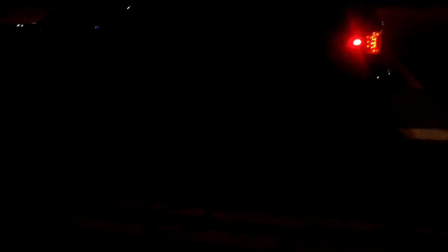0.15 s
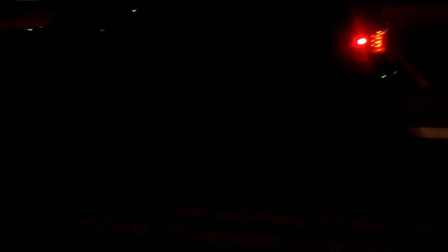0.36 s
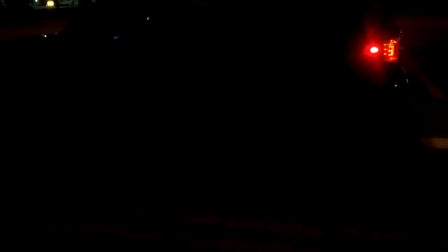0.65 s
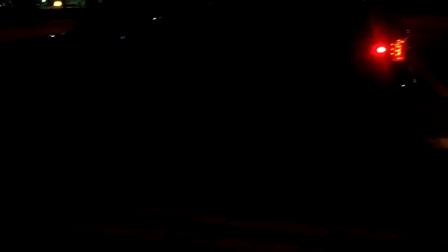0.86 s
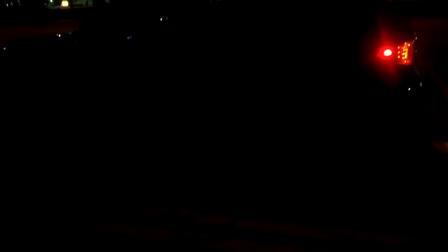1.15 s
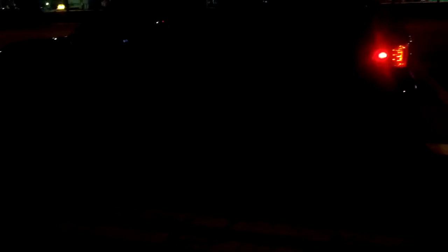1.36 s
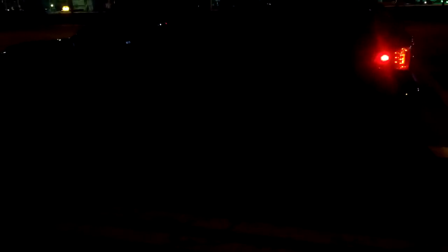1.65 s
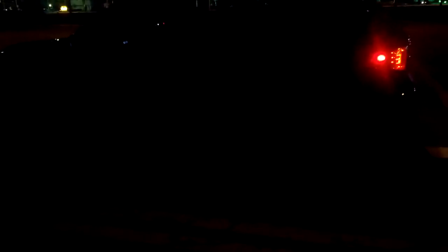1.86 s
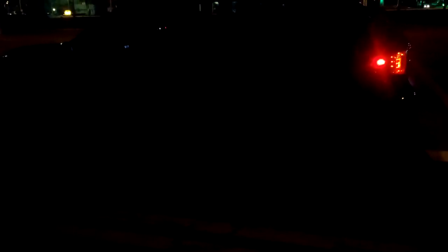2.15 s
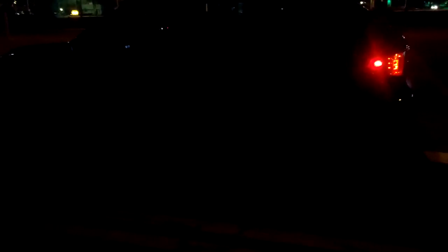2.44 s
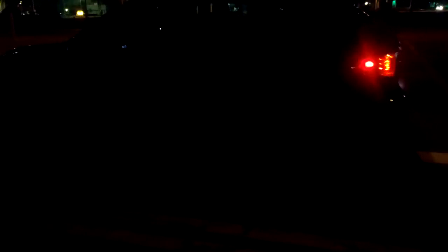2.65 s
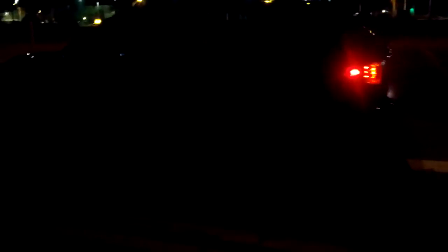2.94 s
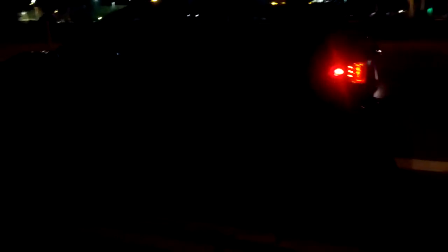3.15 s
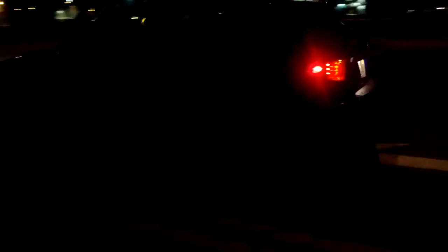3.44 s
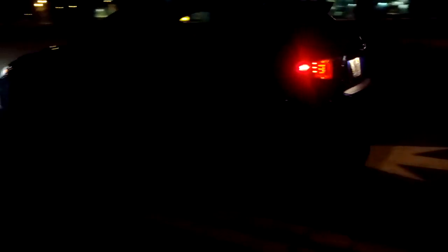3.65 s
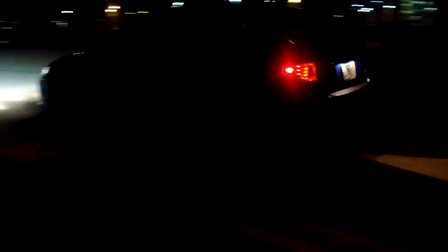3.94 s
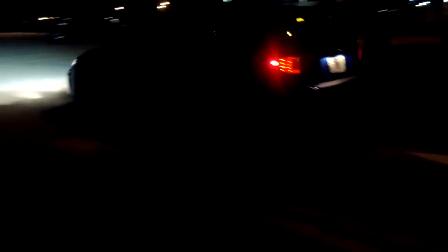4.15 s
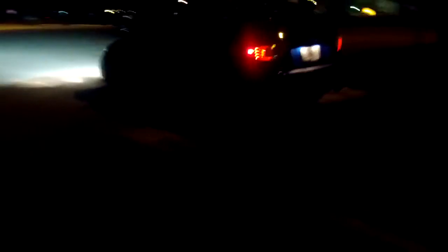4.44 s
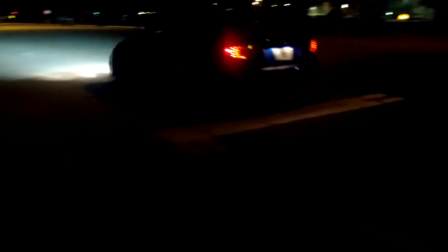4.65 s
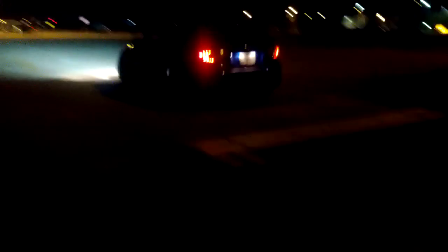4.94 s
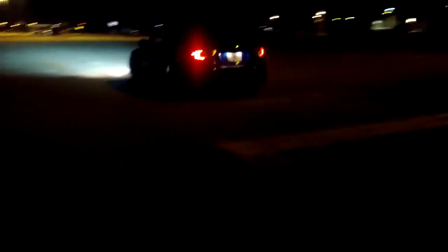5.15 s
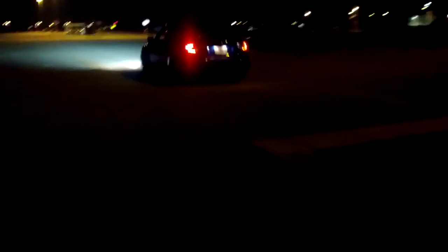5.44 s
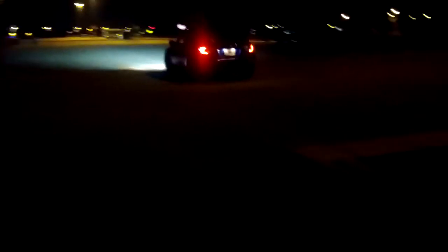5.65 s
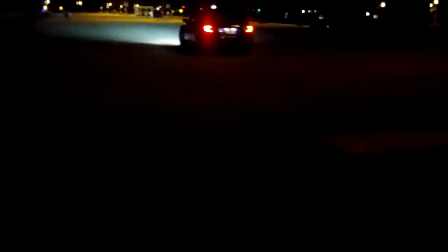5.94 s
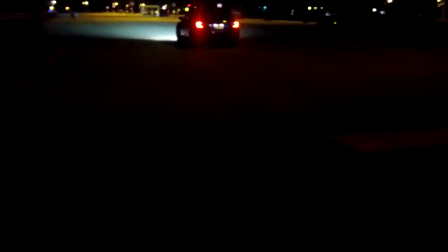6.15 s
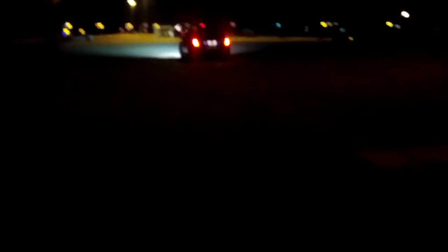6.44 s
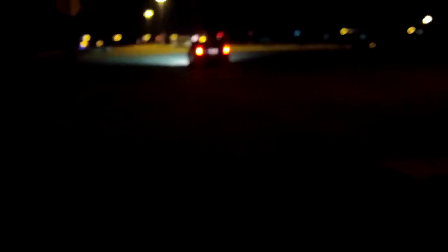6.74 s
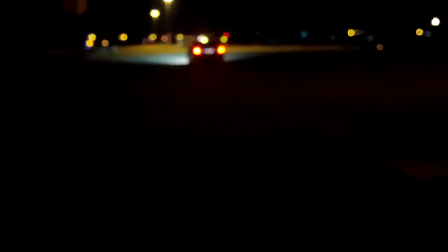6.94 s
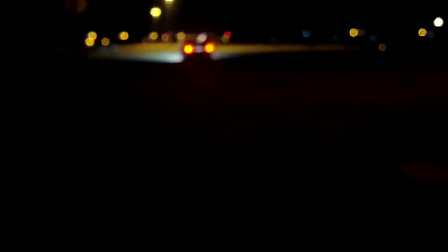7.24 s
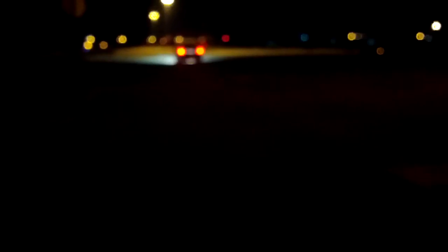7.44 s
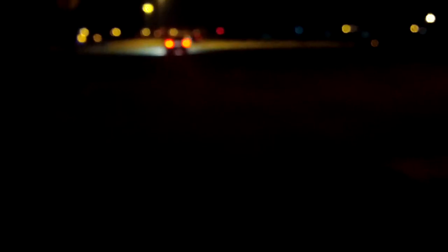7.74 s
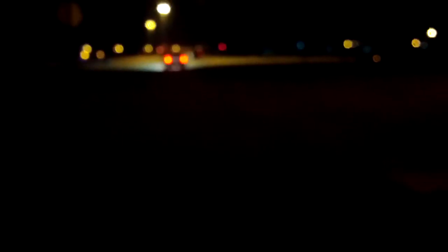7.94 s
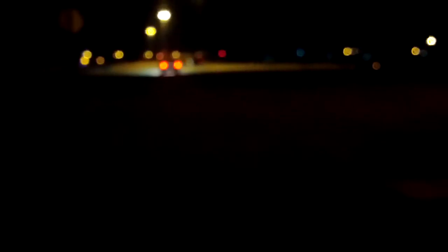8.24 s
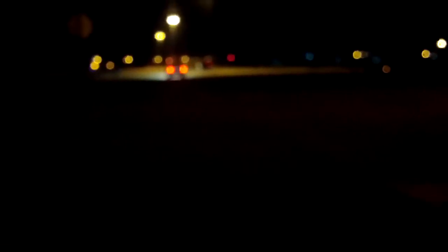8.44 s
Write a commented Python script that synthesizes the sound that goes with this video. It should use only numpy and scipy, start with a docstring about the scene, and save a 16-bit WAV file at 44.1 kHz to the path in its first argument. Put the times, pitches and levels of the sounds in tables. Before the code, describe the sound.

A car with an open exhaust idles close by with a deep, uneven throb, then revs twice. It pulls away at low revs, puttering and slapping, and accelerates in one long climb that turns into a tearing rasp. The driver lifts off and the engine drones more quietly as it recedes down the street. Tyre roar and low town rumble lie underneath, and the loudest pulses slightly overload the microphone.

```python
"""A throbbing, unmuffled car idles close by, revs twice, tears away down a street and coasts off.
Its four cylinders fire in pairs, bank against bank, and ring the open pipe: that is the throb.
Under load the pulses slap out of the pipe; at high revs they steepen into a tearing rasp.
A breathy drone, hiss, a fan and a buzzing heat shield sit around it, over tyres and town rumble.
The loudest pulses overload the microphone."""
import sys
import numpy as np
from scipy import signal
from scipy.fft import rfft, irfft, next_fast_len
from scipy.io import wavfile
from scipy.ndimage import uniform_filter1d, map_coordinates

SR = 44100
rng = np.random.default_rng(int(sys.argv[2]) if len(sys.argv) > 2 else 0)


def bounce(signal):
    """Save signal as a 16-bit WAV file at the path given by the first command-line argument."""
    frames = np.transpose(np.atleast_2d(signal))
    limited = np.clip(frames, -1, 1)
    pcm = np.round(limited * 32767).astype(np.int16)
    wavfile.write(sys.argv[1], SR, pcm)


N = 378378
TIME = np.arange(N) / SR

# each cylinder in firing order; the sign is its bank (push [relative])
CYLINDERS = [0.78, 0.76, -0.84, -1.06]
# level ride of the exhaust note (time [s], relative level [dB])
EXHAUST_RIDE = [(0.76, -18), (1.39, -18), (1.85, -8.5), (2.82, -11), (3.28, -6.5), (4.36, -10),
                (5.06, -6.5), (5.37, -11), (5.84, -9.5), (7.12, -12.5), (7.36, -26), (7.91, -21.5),
                (8.12, -25), (8.34, -21), (8.56, -28.5)]


def amp(db):
    """Decibels to amplitude."""
    return 10 ** (np.asarray(db) / 20)


def unit(x):
    """Scales x to rms 1."""
    return x / np.sqrt(np.mean(x ** 2) + 1e-20)


def curve(points, t=TIME):
    """Joins (time, value) points with straight lines."""
    return np.interp(t, *np.transpose(points))


def ramp(start_s, length_s):
    """Rises from 0 to 1."""
    return np.clip((TIME - start_s) / length_s, 0, 1)


def db_at(points, hz):
    """Reads a spectrum along a log frequency axis."""
    f, db = np.transpose(points)
    return np.interp(np.log(hz + 1), np.log(f + 1), db)


def colour(x, eq):
    """Shapes x with an EQ curve, at rms 1."""
    size = next_fast_len(len(x) + 4096)
    gain = amp(db_at(eq, np.fft.rfftfreq(size, 1 / SR)))
    return unit(irfft(rfft(x, size) * gain, size)[:len(x)])


def resonator(eq, size=4096):
    """Frequency grid and complex log gain of a passive resonator with this spectrum."""
    hz = np.arange(size // 2 + 1) * 2
    log_gain = np.log(amp(db_at(eq, hz)))
    mirrored = np.r_[log_gain, log_gain[-2:0:-1]]
    return hz, signal.hilbert(mirrored).conj()[:len(hz)]


def wander(t, rate):
    """Smooth random drift of spread about 1, with rate changes per unit of t."""
    return map_coordinates(rng.standard_normal(4096), [t * rate], order=3, mode="wrap")


def firing_hz(flywheel_s=.121):
    """Firings per second; the flywheel rounds off every change."""
    # engine speed (time [s], firing rate [Hz])
    engine_speed = [(0.7, 50.9), (1.508, 52.82), (2.145, 75.84), (2.477, 71.64), (2.944, 54.33),
                    (3.464, 71.58), (3.935, 55.65), (4.277, 47.4), (4.353, 54.18), (4.882, 72.29),
                    (5.509, 100.61), (5.984, 124.72), (6.783, 174.93), (7.146, 193.62), (7.356, 186.14),
                    (7.571, 188.37), (7.726, 177.13), (8.356, 138.98), (8.58, 131.81)]
    return uniform_filter1d(curve(engine_speed), int(flywheel_s * SR), mode="nearest")


def revs(idle_hz=51):
    """Engine speed in octaves above idle."""
    return np.log2(firing_hz() / idle_hz)


def load(clutch_s=3.01, lift_off_s=7.19):
    """How hard the engine pulls, 0-1: the clutch bites, later the driver lifts off."""
    return ramp(clutch_s, .31) - ramp(lift_off_s, .13)


def idling(octaves=.19):
    """1 while the engine ticks over, 0 once it is revved or pulls."""
    return (1 - load()) * np.exp(-(revs() / octaves) ** 2)


def tearing(centre_hz=163.5, octaves=.53):
    """How far the pulses steepen into shocks, 0-1: only under load, around one firing rate."""
    return load() * np.exp(-(np.log2(firing_hz() / centre_hz) / octaves) ** 2)


def overrunning(start_s=7.3, stop_s=7.78):
    """The short spell after lift-off in which the pipe drones, 0-1."""
    return ramp(start_s, .17) - ramp(stop_s, .047)


def distance_db(roll_s=3.716, near_m=2.79, accel_m_per_s2=1.61):
    """Level lost by spreading as the car rolls away, gaining speed evenly."""
    travelled_m = .5 * accel_m_per_s2 * np.maximum(TIME - roll_s, 0) ** 2
    return -20 * np.log10(np.hypot(near_m, travelled_m) / near_m)


def firing_gate(cycles, lead, decay, weak_bank, floor=1.0):
    """Jumps at each firing and dies away; weak_bank scales one bank. Lead and decay are in firings."""
    firings = cycles * len(CYLINDERS) + lead
    strength = np.where(firings % len(CYLINDERS) < 2, 1, weak_bank)
    return unit(floor + strength * np.exp(-(firings % 1) / decay))


def crack(firings):
    """Force of each firing: lumpy while the engine lugs at low revs, more even when it spins."""
    # the pulses of one cycle, counted from the hardest (force [relative])
    forces = [1.9, 1.1, .3, .25]
    # the cylinder that hits hardest (from time [s], place in firing order [index])
    hardest = [(0, 1), (2.95, 0), (3.3, 1), (3.6, 0), (3.85, 2), (4.42, 3), (5.05, 1)]
    from_s, places = np.transpose(hardest)
    leader = places[np.searchsorted(from_s, TIME, side="right") - 1]
    place = (np.floor(firings) - leader).astype(int) % len(forces)
    lumpiness = np.interp(TIME, [2.9, 3.2, 5, 6.2], [.3, 1, 1, .4])
    return 1 + lumpiness * (np.take(forces, place) - 1)


def street(waver_db=-1.4):
    """The bed: tyre roar and low town rumble."""
    # roar and rumble (frequency [Hz], gain [dB])
    eq = [(20, 1), (60, 6.5), (200, 15.5), (450, -2), (700, -5), (950, 2.5), (1200, 3), (1550, -7.5),
          (2500, -18.5), (4000, -26.5), (8000, -30.5), (15000, -43)]
    # swell of the bed (time [s], level [dB])
    swell = [(.7, -74.5), (4, -45.5), (6, -19.5), (7.4, -29.5), (8, -29.5), (8.58, -32)]
    return amp(curve(swell) + waver_db * wander(TIME, 12)) * colour(rng.standard_normal(N), eq)


def street_echo(x, level_db=-19, t60_s=5.2):
    """The buildings along the street hold a long, faint tail."""
    t = TIME[:2 * SR]
    tail = rng.standard_normal(len(t)) * amp(-60 * t / t60_s)
    return amp(level_db) * signal.fftconvolve(x, tail / np.linalg.norm(tail))[:N]


def ticks(decay_s=.003, gain_db=-8):
    """Short dry ticks of noise."""
    # tick cues (time [s], relative level [dB])
    cues = [(4.7344, -23), (4.9843, -17.5), (8.4622, -31)]
    envelope = sum(amp(db + gain_db) * (TIME >= s) * np.exp(-abs(TIME - s) / decay_s) for s, db in cues)
    return envelope * rng.standard_normal(N)


def thump(at_s=4.985, width_s=.028, level_db=-19):
    """One dull, low thud while the car accelerates."""
    # low boom (frequency [Hz], gain [dB])
    eq = [(15, -13), (35, -2), (90, -3), (200, -13), (600, -45), (3000, -80)]
    return amp(level_db) * np.exp(-((TIME - at_s) / width_s) ** 2) * colour(rng.standard_normal(N), eq)


def squeal(pitch_hz=4170, waver_hz=18):
    """A thin, faint squeal as the car starts to roll."""
    # it swells just before it stops (time [s], close-up level [dB])
    swell = [(2.9, -68), (3.1, -51), (3.66, -60), (3.81, -43), (3.97, -75)]
    phase = 2 * np.pi * np.cumsum(pitch_hz + waver_hz * wander(TIME, 150)) / SR
    return amp(curve(swell) + distance_db()) * np.sin(phase)


def cooling_fan():
    """Two thin, wavering fan tones at idle, fading out during the revving."""
    # fan tones (frequency [Hz], relative level [dB])
    tones = [(473.7, -44), (554.5, -46.5)]
    whine = sum(amp(db) * np.sin(2 * np.pi * hz * TIME + 1.7 * wander(TIME, 9.9)) for hz, db in tones)
    return np.interp(TIME, [1.6, 3.2], [.6, 0]) * np.sqrt(2) * whine


def hiss(cycles, idle_db=-43.5, per_octave_db=6, load_db=1.5):
    """A fine, lightly pulsing hiss from engine bay and pipe, heard while the car is close."""
    # airy top end (frequency [Hz], gain [dB])
    eq = [(2000, -15), (4000, -2), (6500, -15), (8000, -5.5), (10000, 2), (11500, 0.5), (13000, -3),
          (15700, -8.5)]
    gate = firing_gate(cycles, lead=.55, decay=.22, weak_bank=.38, floor=.9)
    level = amp(idle_db + per_octave_db * revs() + load_db * load() + distance_db())
    return level * (1 - ramp(4.84, 1.1)) * colour(gate * rng.standard_normal(N), eq)


def heat_shield(cycles, level_db=-49, lug_octaves=.56):
    """A loose heat shield buzzes while the engine lugs under load at low revs."""
    # ring of the shield (frequency [Hz], gain [dB])
    eq = [(1900, -35), (2450, -3), (2720, 0), (3000, -16), (3350, -30), (3700, -9), (4100, -22),
          (5500, -36)]
    gate = firing_gate(cycles, lead=0, decay=.56, weak_bank=.8)
    lugging = load() * np.exp(-(revs() / lug_octaves) ** 2)
    return amp(level_db) * lugging * colour(gate * rng.standard_normal(N), eq)


def close_drone(cycles, idle_db=-42, per_octave_db=13):
    """A pulsing, breathy drone near 420 and 660 Hz, heard while the car is close."""
    # tone of the drone (frequency [Hz], gain [dB])
    eq = [(220, -26), (340, 7.5), (420, 13), (490, -5), (660, 2), (900, -10), (1600, -23), (2100, -17),
          (2550, -10.5), (3100, -15.5), (3700, -10.5), (5000, -29)]
    gate = firing_gate(cycles, lead=.075, decay=.2, weak_bank=.7)
    level = amp(idle_db + per_octave_db * revs()) * (1 - ramp(2.5, 1.5))
    return level * colour(gate * rng.standard_normal(N), eq)


def overrun(cycles, level_db=-29):
    """Just after lift-off the pipe drones briefly, at one wave per turn of the crankshaft."""
    return amp(level_db) * overrunning() * np.sin(2 * np.pi * 2 * cycles)


def gas_db(idle_db=-45, per_octave_db=6, load_db=12.5, tear_db=17):
    """Base level of the gas leaving the tailpipe: it grows with revs, load and tearing."""
    close_db = idle_db + per_octave_db * revs() + load_db * load() + tear_db * tearing(octaves=.48)
    return close_db + distance_db()


def puffs(cycles, gain_db=-2.5, load_db=-3):
    """Turbulent gas bursts from the pipe with each firing."""
    # breathy midrange (frequency [Hz], gain [dB])
    eq = [(60, -45), (150, -11), (300, 7), (450, -3), (620, 4), (800, 1.5), (1150, -4), (1500, -15),
          (2200, -11), (4000, -22)]
    firings = cycles * len(CYLINDERS)
    gate = .1 + crack(firings) * np.exp(-(firings % 1) / .3)
    return amp(gas_db() + gain_db + load_db * load()) * colour(gate * rng.standard_normal(N), eq)


def slaps(cycles, gain_db=-15.5, slack_db=-13, tear_db=-9):
    """Under load the steep front of each pulse slaps out of the pipe, giving way to the rasp."""
    # hollow smack of the open pipe (frequency [Hz], gain [dB])
    eq = [(60, -50), (150, -26), (300, -12), (430, 9), (550, 10.5), (700, -26), (900, -2), (1200, 7),
          (1500, -10), (1800, -6), (2600, -51), (5000, -40)]
    firings = np.floor(cycles * len(CYLINDERS) - .14)
    force = crack(firings) * amp(1.5 * rng.standard_normal(N))
    clicks = np.diff(firings, prepend=firings[0]) * force / np.sqrt(firing_hz())
    level_db = gas_db() + gain_db + slack_db * (1 - load()) + tear_db * tearing()
    return amp(level_db) * colour(clicks, eq)


def dull(x, above_hz=3000):
    """A moving treble tilt: the top end falls away as the car goes off."""
    # treble slope (time [s], tilt [dB per octave])
    tilt = [(.7, -4), (2.2, 1), (5, -1.5), (5.8, -2), (6.4, -1), (7, -1), (7.3, -5.5), (7.8, -6),
            (8.58, -8)]
    hz, t, spectrum = signal.stft(x, SR, nperseg=256)
    octaves = np.log2(np.maximum(hz / above_hz, 1))
    return signal.istft(spectrum * amp(octaves[:, None] * curve(tilt, t)), SR)[1][:N]


def rasp(cycles, idle_db=-42, per_octave_db=4, tear_db=31, ring_s=.005, spread_db=5, flutter_db=1):
    """At high revs the pulses steepen into shocks that rattle down the pipe amid torn gas."""
    # bright, ripping edge (frequency [Hz], gain [dB])
    eq = [(200, -64), (700, -6), (1000, 6), (1230, 3), (1550, 0), (1800, 3.5), (2100, -2), (2400, 1),
          (3100, -5.5), (3650, -3), (4300, -5), (7500, -4.5), (11500, -6.5), (13500, -15.5), (15700, -18)]
    gate = firing_gate(cycles, lead=.016, decay=1, weak_bank=1)
    onsets = np.diff(np.floor(cycles * len(CYLINDERS)), prepend=0)
    clicks = onsets * gate * amp(spread_db * rng.standard_normal(N))
    ring = rng.standard_normal(1024) * np.exp(-TIME[:1024] / ring_s)
    shocks = unit(signal.oaconvolve(clicks, ring)[:N])
    torn_gas = unit(gate * rng.standard_normal(N))
    shock_share = .13 * (.04 + tearing())
    blend = np.sqrt(shock_share) * shocks + np.sqrt(1 - shock_share) * torn_gas
    level_db = idle_db + per_octave_db * revs() + tear_db * tearing() + distance_db()
    direct = amp(level_db + flutter_db * wander(TIME, 45)) * colour(blend, eq)
    return dull(direct + street_echo(direct))


def snarl(cycles, gain_db=-17, waver_db=-.2):
    """Around the tearing range, the orders just above firing harmonics 3-7 sing out in the pipe."""
    # the pipe's response to the snarl (frequency [Hz], gain [dB])
    eq = [(300, -14), (440, -5.5), (540, 5), (720, -13), (900, -7), (1300, -4)]
    cycle_hz = firing_hz() / len(CYLINDERS)
    partials = np.zeros(N)
    for order in len(CYLINDERS) * np.arange(3, 8) + 1:
        level = amp(db_at(eq, order * cycle_hz) + waver_db * wander(TIME, 12))
        partials += level * np.cos(2 * np.pi * order * cycles)
    return amp(gain_db + distance_db()) * tearing(octaves=.64) * partials


def chug(x, cycles, above_hz=370, depth=.73):
    """Hard firings gain upper mids and soft ones lose them, so the note putters."""
    upper = signal.sosfiltfilt(signal.butter(4, above_hz, "highpass", fs=SR, output="sos"), x)
    force = uniform_filter1d(crack(cycles * len(CYLINDERS)), size=128)
    return x + depth * (force - 1) * upper


def growl_db(hz, t, boost_db=4, centre_hz=250, octaves=.18):
    """A growl near 250 Hz swells as the car pulls away."""
    swell = np.interp(t, [3.5, 4.07], [0, 1])
    return boost_db * swell * np.exp(-(np.log2(hz / centre_hz) / octaves) ** 2)


def brightness(slack_db=-8.5, per_octave_db=3, load_db=3, pull_per_octave_db=3.5, overrun_db=1.5):
    """Tilt of the note in dB per octave: revs and pulling sharpen the pulses, distance dulls them."""
    pulling = load() * (load_db + pull_per_octave_db * revs())
    return slack_db + per_octave_db * revs() + pulling + overrun_db * overrunning() + .58 * distance_db()


def overtones_db(full_db=-2, per_octave_db=5.5, follow=.81, loud_db=-7):
    """Overtones of the firing against the throb: they fall away when the engine runs softly."""
    return full_db + per_octave_db * revs() + follow * (curve(EXHAUST_RIDE) - loud_db)


def note_db(idle_db=1.06, per_octave_db=-4, load_db=4):
    """The firing note against the throb: strongest when the engine lugs at low revs."""
    return idle_db + per_octave_db * revs() + load_db * load()


def exhaust(cycles, roughness=.035, jitter_cycles=.001, bank_lag_s=-.00016, gain_db=.53):
    """Orders of the engine cycle ring the pipe: even firing gives every fourth, the banks the rest."""
    # the pipe's response to both banks together (frequency [Hz], gain [dB])
    together_eq = [(35.0, -27), (55.0, -7), (85.0, 4), (112.0, 2.5), (138.0, 5.5), (165.0, 5), (197.0, 1.5),
                   (245.0, 2.2), (290.0, -1.5), (350.0, -7.5), (450.0, -17.5), (560.0, -41.5), (900.0, -32),
                   (2000.0, -30.5)]
    # its response to one bank against the other (frequency [Hz], gain [dB])
    opposed_eq = [(35.0, -57), (55.0, -19.5), (85.0, -6), (112.0, 0.5), (138.0, 12), (165.0, 8),
                  (197.0, -9.5), (245.0, 3), (290.0, 0.5), (350.0, -3.5), (450.0, -11), (560.0, -8),
                  (900.0, -26), (2000.0, -45.5)]
    # the manifold favours some orders (order [per cycle], gain [dB])
    manifold = [(2, -18), (3, -12), (4, 0), (5, 3), (6, 3.5), (7, -.6), (8, 0), (9, 2), (10, 2), (11, -1),
                (12, -1), (13, -2), (14, 3), (15, -3), (16, 0)]
    step = 9  # the note is low, so it is built at a reduced sample rate
    t, cycles, cycle_hz = TIME[::step], cycles[::step], firing_hz()[::step] / len(CYLINDERS)
    overtones, note, tilt = amp(overtones_db()[::step]), amp(note_db()[::step]), brightness()[::step]
    firings = cycles * len(CYLINDERS)
    cycles = cycles + jitter_cycles * wander(firings, 1)  # no two firings are quite alike
    bank_pattern = np.fft.fft(CYLINDERS) / len(CYLINDERS)
    together, opposed = resonator(together_eq), resonator(opposed_eq)
    waver_db = np.interp(t, [6.5, 7.5], [.5, 1.5])  # street reflections make far partials fade
    sharpening = .31 * idling()[::step]  # with little gas flow to damp it, the pipe rings more narrowly
    tone, power = np.zeros((2, len(t)))
    for order in range(2, 56):
        hz, place = order * cycle_hz, order % len(CYLINDERS)
        if place:  # the throb between the firing harmonics
            response = np.interp(hz, *opposed)
            response += sharpening * (response.real - opposed[1].real.max())
            partial = bank_pattern[place] * np.exp(response - 2j * np.pi * hz * bank_lag_s)
        else:
            partial = (note if order == len(CYLINDERS) else overtones) * np.exp(np.interp(hz, *together))
        rolloff = np.clip(1 - (hz - 330) / (36 * cycle_hz - 180), 0, 1)  # faster pulses reach higher
        shape_db = db_at(manifold, order) + growl_db(hz, t) + tilt * np.log2(hz / 150)
        partial = partial * rolloff * amp(shape_db + waver_db * wander(t, 7))
        tone += (partial * np.exp(2j * np.pi * order * cycles)).real
        power += abs(partial) ** 2 / 2
    tone *= amp(curve(EXHAUST_RIDE, t) + gain_db) / np.sqrt(power)
    tone *= 1 + roughness * wander(firings, .94)
    return signal.resample_poly(tone, step, 1)[:N]


def scene():
    """Everything from the tailpipe follows one crankshaft; small noises and the street lie around it."""
    cycles = np.cumsum(firing_hz()) / SR / len(CYLINDERS)  # one engine cycle is two crankshaft turns
    note = chug(exhaust(cycles), cycles) + snarl(cycles)
    tailpipe = note + slaps(cycles) + puffs(cycles) + rasp(cycles) + overrun(cycles)
    car = tailpipe + close_drone(cycles) + heat_shield(cycles) + hiss(cycles) + cooling_fan() + squeal()
    return (car + street() + thump() + ticks())[None]


def record(dry, start_s=.725, ceiling=.74, cutoff_hz=15800):
    """The microphone opens abruptly and flattens the loudest pulses; a low-pass trims the top."""
    live = dry * (TIME >= start_s)
    clipped = live / (1 + (live / ceiling) ** 12) ** (1 / 12)
    lowpass = signal.firwin(511, cutoff_hz, window=("kaiser", 9), fs=SR)
    return signal.oaconvolve(clipped, lowpass[None], "same")


dry = scene()
out = record(dry)
bounce(out)
```